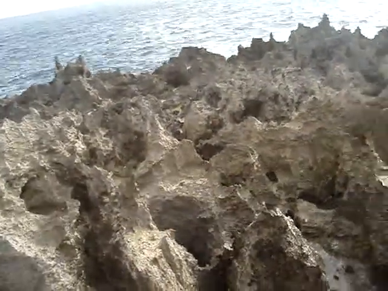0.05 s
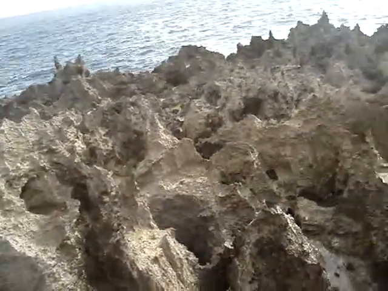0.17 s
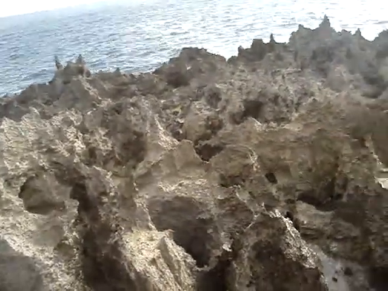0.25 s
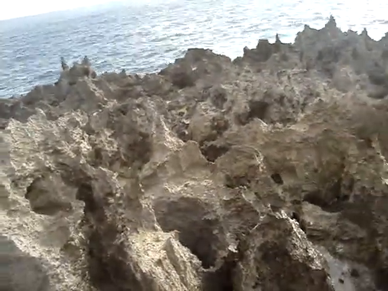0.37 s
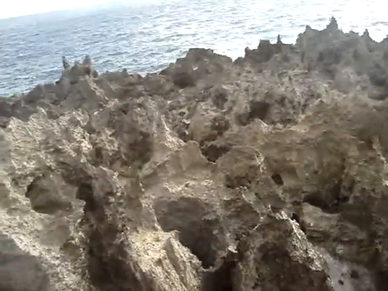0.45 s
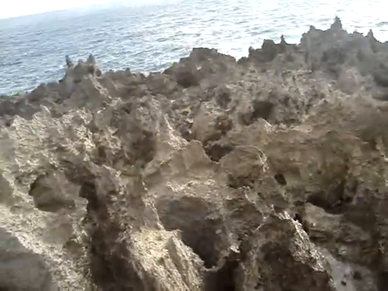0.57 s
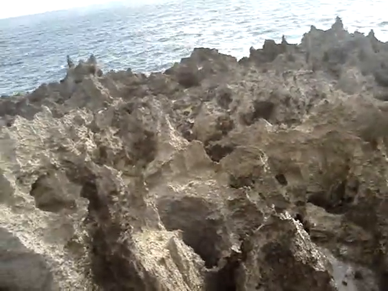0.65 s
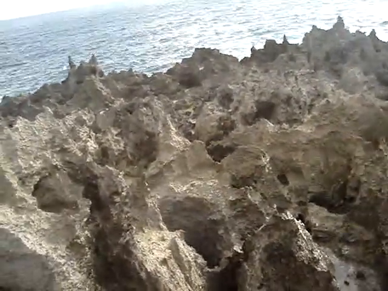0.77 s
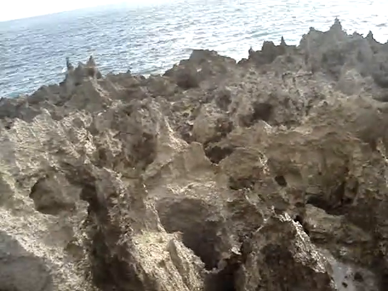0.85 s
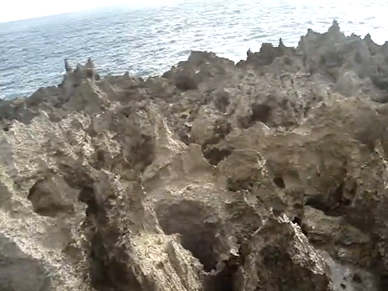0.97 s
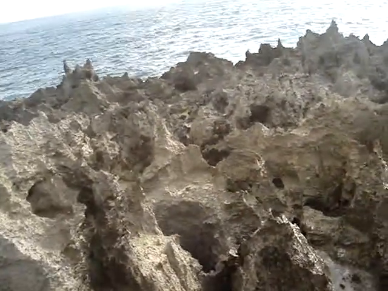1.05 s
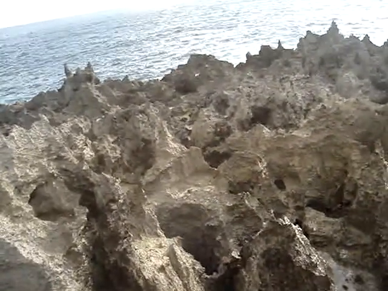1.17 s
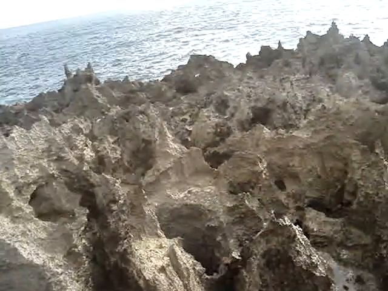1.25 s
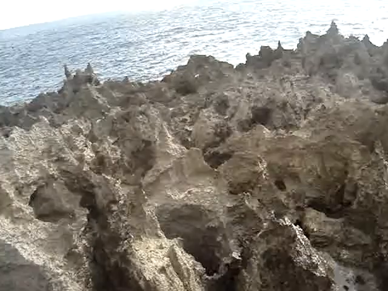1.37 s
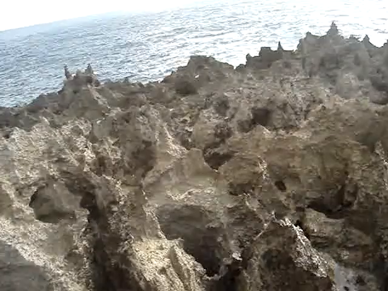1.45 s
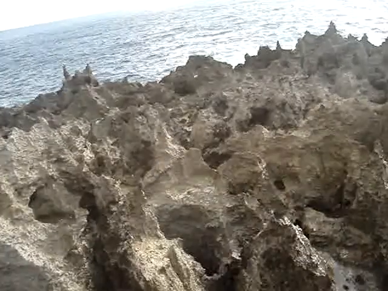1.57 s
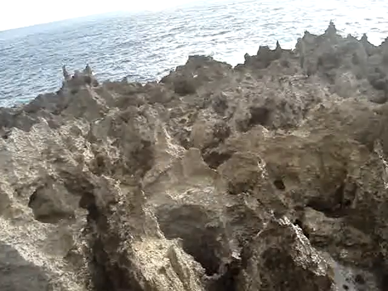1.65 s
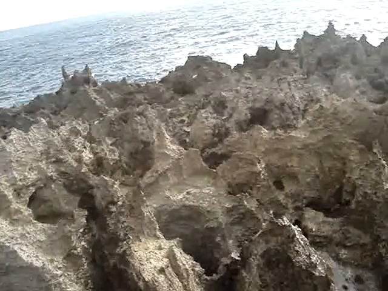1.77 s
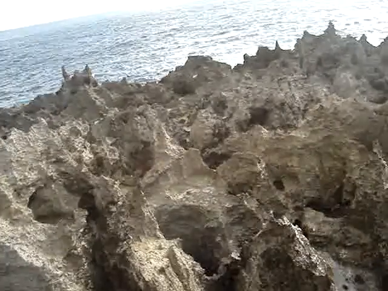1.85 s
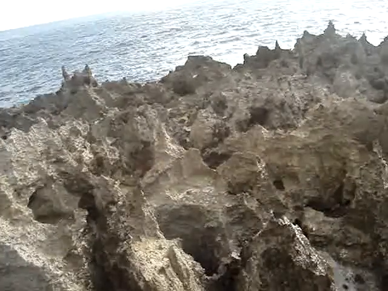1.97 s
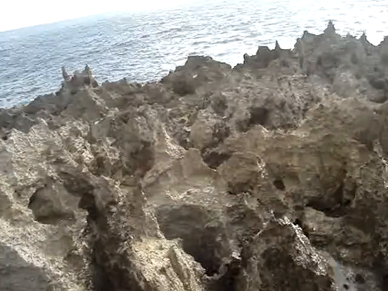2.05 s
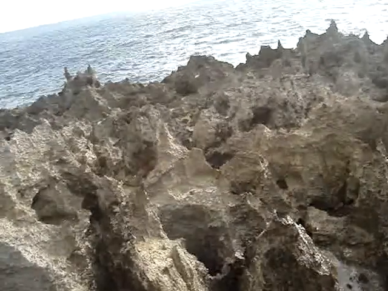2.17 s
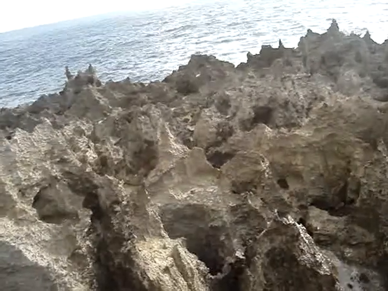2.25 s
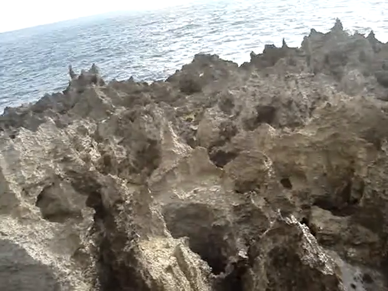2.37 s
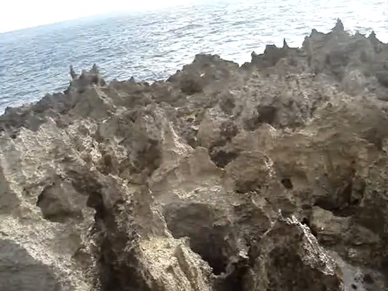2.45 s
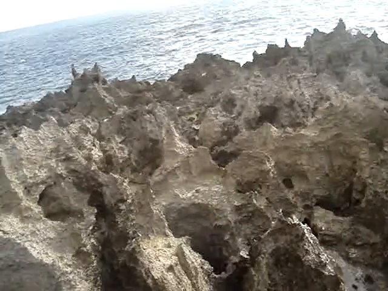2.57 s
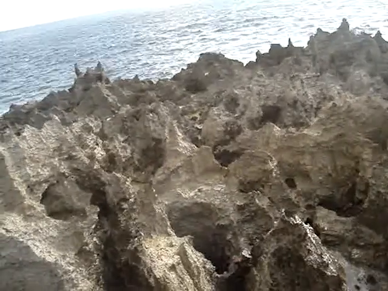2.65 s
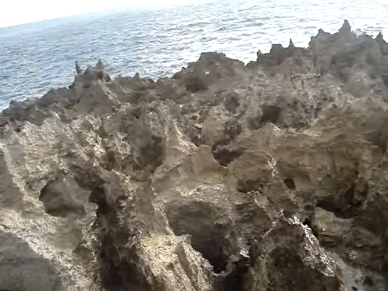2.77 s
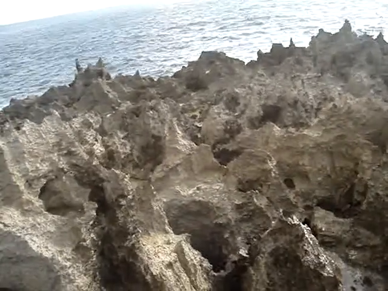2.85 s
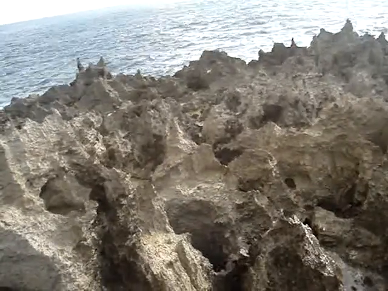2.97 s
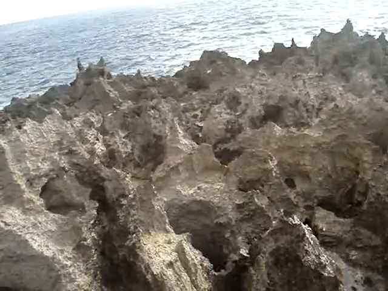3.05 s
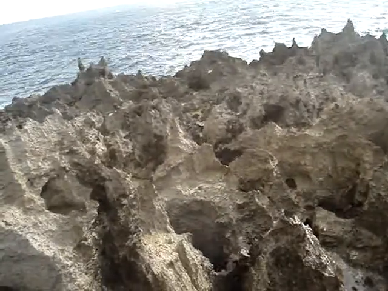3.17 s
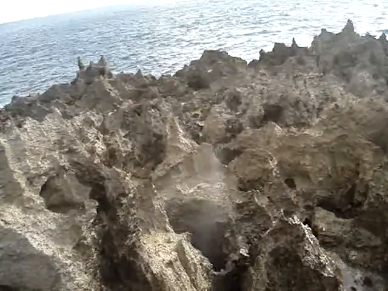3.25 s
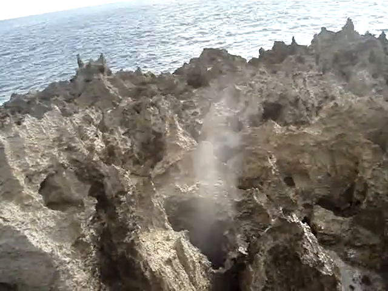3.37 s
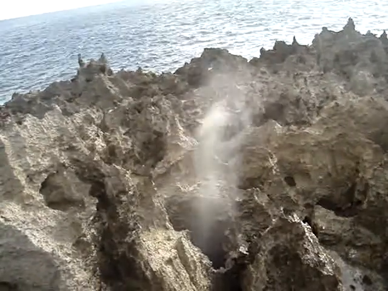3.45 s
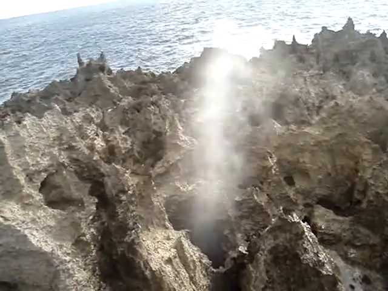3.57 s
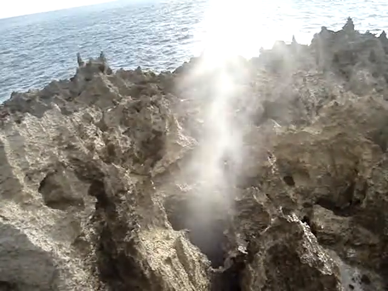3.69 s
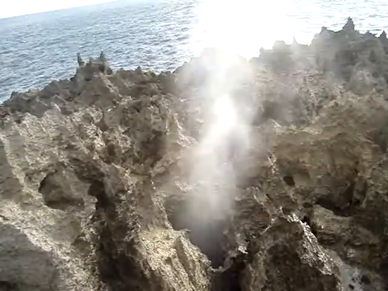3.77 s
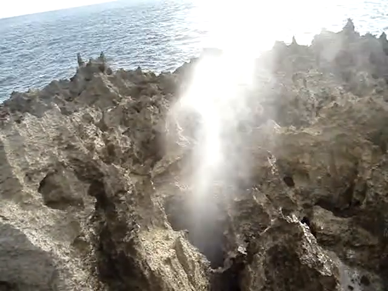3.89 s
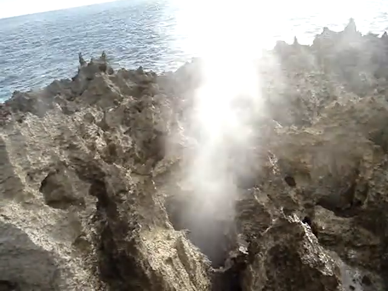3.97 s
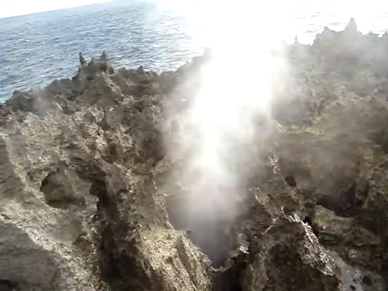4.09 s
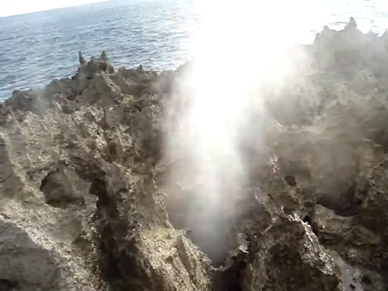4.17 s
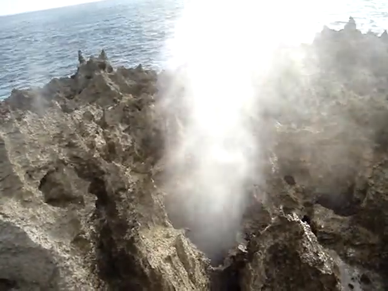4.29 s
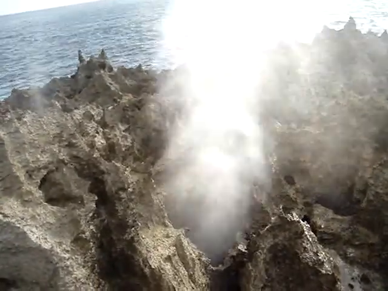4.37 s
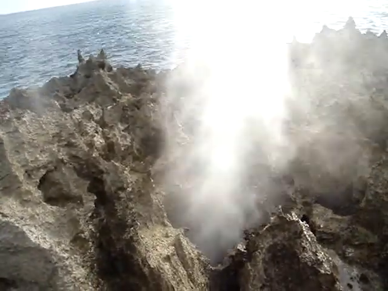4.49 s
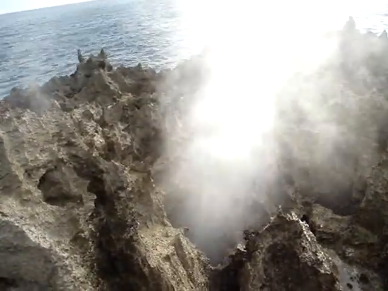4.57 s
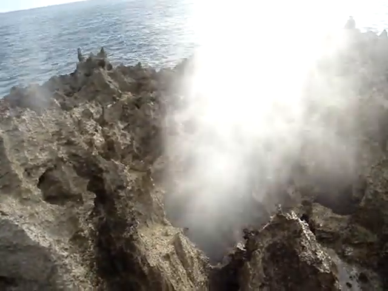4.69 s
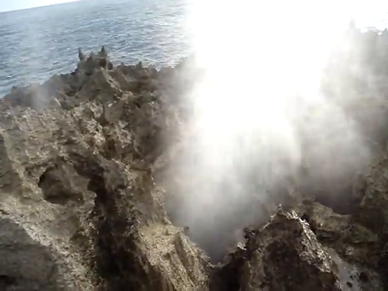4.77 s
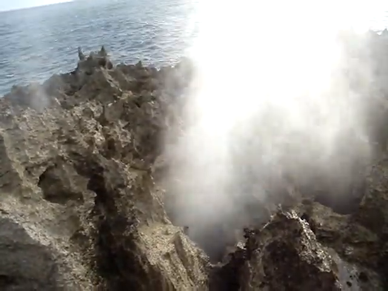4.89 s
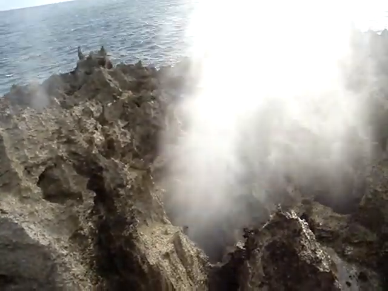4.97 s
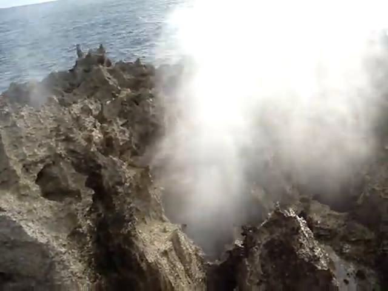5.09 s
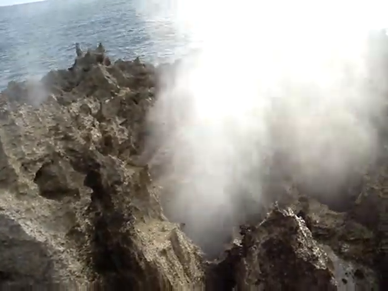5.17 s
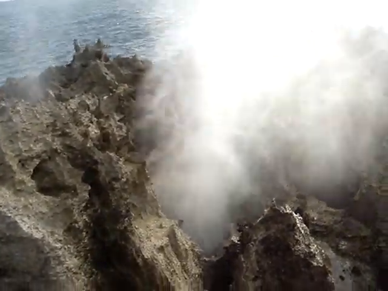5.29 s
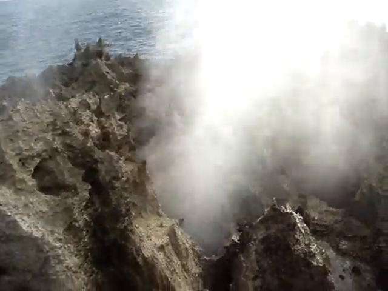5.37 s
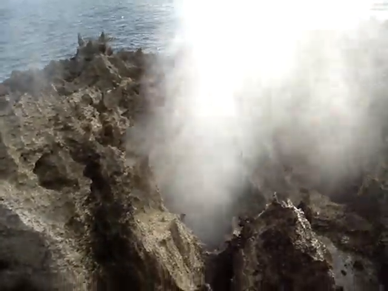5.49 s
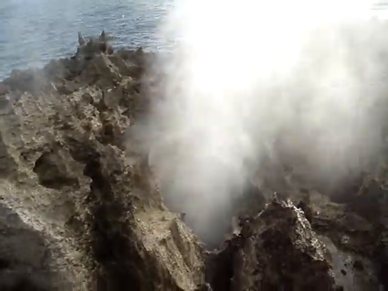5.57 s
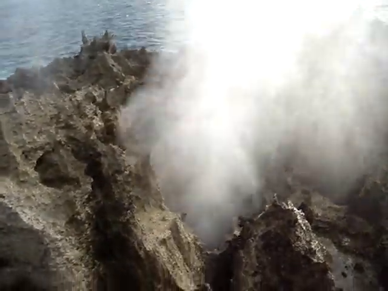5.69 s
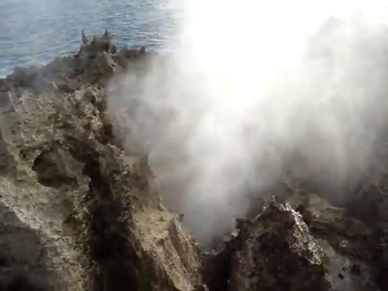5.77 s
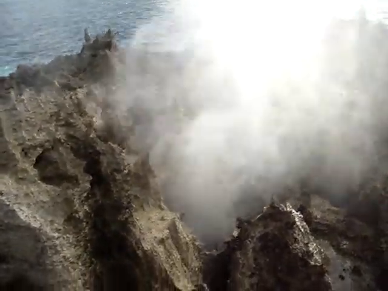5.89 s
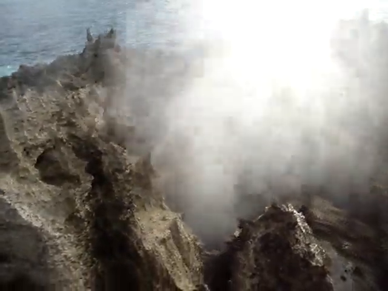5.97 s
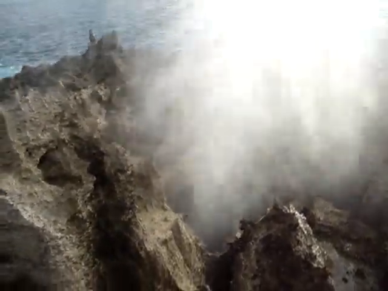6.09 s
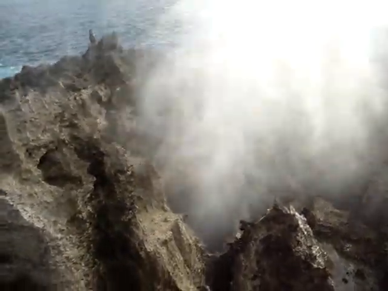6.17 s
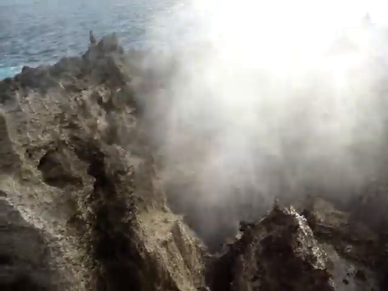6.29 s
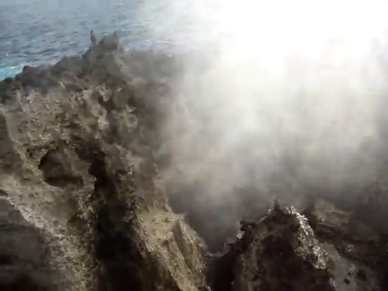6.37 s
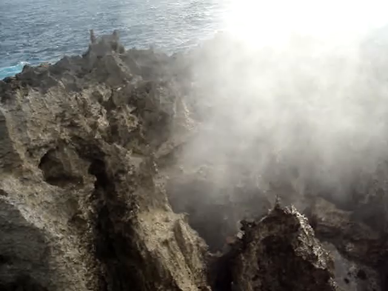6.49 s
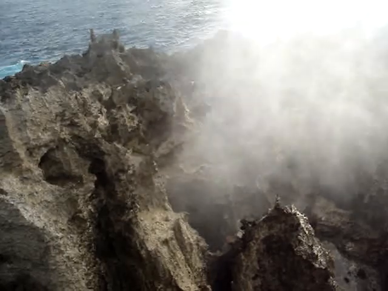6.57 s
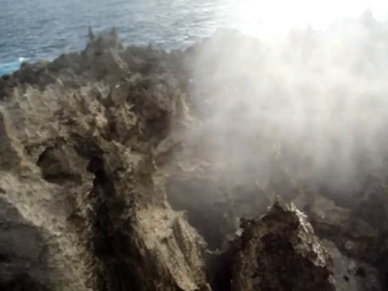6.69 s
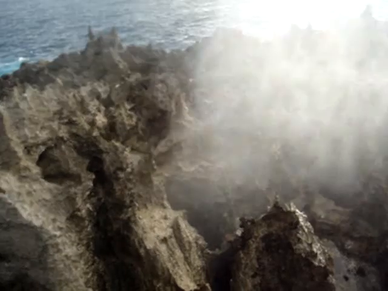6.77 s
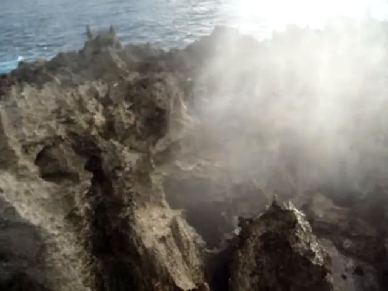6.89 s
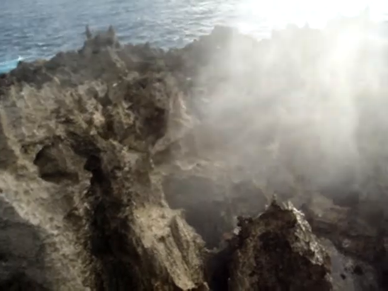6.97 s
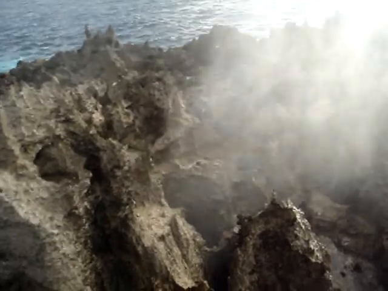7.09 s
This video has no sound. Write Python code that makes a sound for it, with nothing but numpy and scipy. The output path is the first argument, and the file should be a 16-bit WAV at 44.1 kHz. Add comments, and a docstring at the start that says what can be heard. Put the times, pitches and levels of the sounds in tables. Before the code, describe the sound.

On a rocky coast, steady surf and light wind rumble on the microphone are heard first. Then a wave forces air out of a hole in the rock: the cave below booms and the jet roars loudly, tearing water into a bright hiss for about three seconds. It drops away fast, leaving a light patter of falling drops, soft low thumps and a faint hoot over the surf.

```python
"""A blowhole on a rocky shore roars as a wave fills the cave below and forces air out of the rock throat.
The cave rumbles and thumps, and the jet tears water into hissing spray for about three seconds.
The jet shuts off quickly; spray patters down on the rocks and the draining hole hoots faintly.
Behind it are steady surf, two small splashes, a little wind on the microphone and a very faint whine."""
import sys
import numpy as np
from scipy import signal
from scipy.fft import rfft, irfft, next_fast_len
from scipy.io import wavfile
from scipy.ndimage import uniform_filter1d, map_coordinates

SR = 44100
rng = np.random.default_rng(int(sys.argv[2]) if len(sys.argv) > 2 else 0)


def wav_out(sig):
    """Save sig, one row per channel (or a flat mono array), as 16-bit PCM at SR to the path in sys.argv[1]."""
    wavfile.write(sys.argv[1], SR, np.round(np.clip(np.atleast_2d(sig).T, -1, 1) * 32767).astype(np.int16))


N = 314874

TREBLE_LIMIT_HZ = 10080
FULL_FLOW_DB = -19.5  # the air flow once the jet is at full strength
FILL_START_S, FILL_LENGTH_S = 3.66, 2  # rising water fills the cave

# The tone of the surf, from bass to treble: f/Hz, level/dB
SURF_TONE = [(40, -32), (150, -11.5), (290, -4), (500, -3), (680, -1), (870, 0), (1300, -13), (1550, -9),
             (1800, -12.5), (2600, -15.5), (3100, -16), (5000, -22.5), (8500, -29), (10000, -37)]
# The surf grows a little as a wave breaks: t/s, gain/dB
SURF_SURGES = [(.13, 0.9), (.9, 0.3)]
# The low rumble of wind on the microphone: f/Hz, level/dB
WIND_TONE = [(15, -9.5), (40, 0), (95, 0), (150, -8.5), (300, -32), (800, -74)]
# Gusts of that wind: t/s, half length/s, level/dB
WIND_GUSTS = [(.06, 0.2, -44.5), (1.25, .24, -49), (2.035, .025, -40), (2.73, 0.043, -44),
              (2.93, 0.073, -46), (7.13, 0.026, -37)]
# Small waves splashing on the rocks below: t/s, level/dB
SMALL_WAVES = [(.16, -45), (1.33, -48)]
# Air rushing out of the hole (a first puff, the full jet, the shut-off): t/s, level/dB
AIR_FLOW = [(2.98, -40), (3.13, -33), (3.41, -33.5), (3.84, -19.5), (6.14, -20), (6.53, -24), (6.71, -42),
            (6.78, -38.5), (7.08, -44.5)]
# Water reshapes the throat, so its notes slide and ring more or less: t/s, pitch ratio, ringing/dB
THROAT_CHANGES = [(3.2, 0.98, 1), (3.7, 1.02, 0.5), (4.2, 1.042, 0.5), (5.05, 1.045, 0.5), (5.5, 1.03, 0.5),
                  (5.9, 1.0, 1.5), (6.45, 1.006, 1.5), (6.8, 1.035, 1)]
# The deep boom of the cave: f/Hz, level/dB
BOOM_TONE = [(15, -33), (30, -10), (45, -7.5), (85, -1), (115, -0.5), (150, 2), (190, -6.5), (260, -13.5),
             (500, -66)]
# The notes at which the cave chamber rings: f/Hz, width/Hz, level/dB
CHAMBER_NOTES = [(229, 107, -1), (308, 93, -1.5)]
# The low notes of the rock throat above it: f/Hz, width/Hz, level/dB
THROAT_NOTES = [(591, 99, 1), (726, 150, 1.2), (780, 109, -1), (917, 170, -7.5)]
# The higher notes of the throat: f/Hz, width/Hz, level/dB
THROAT_OVERTONES = [(1165, 150, 2), (1546, 190, 5.5), (2070, 260, 2), (2614, 250, -2.5), (3090, 190, -1.5),
                    (3640, 180, -1.5), (4230, 350, -1.5), (4760, 360, -6)]
# The near-whistle of the throat at its narrowest: f/Hz, width/Hz, level/dB
WHISTLE_NOTE = [(2556, 180, 0)]
# The plain hiss of the jet: f/Hz, level/dB
JET_TONE = [(300, -52), (700, -16.5), (1100, 3), (1800, -4), (3000, -1.5), (4500, -6.5), (5600, -4.5),
            (6800, -10.5), (10000, -23.5)]
# The higher hiss of fine mist: f/Hz, level/dB
MIST_TONE = [(3000, -42), (5000, -10.5), (6300, -3.5), (7000, 2.5), (8500, 4), (9500, 1), (10100, -8)]
# How much water is torn into spray, lagging the air at first: t/s, level/dB
SPRAY_AMOUNT = [(3.0, -51), (3.17, -44), (3.32, -43), (3.91, -27.5), (4.81, -24.5), (5.83, -24),
                (6.45, -27), (6.65, -39), (7.1, -43.5)]
# Water slams into the back of the cave and later sloshes back: t/s, half length/s, level/dB
WATER_BLOWS = [(3.967, 0.19, -22), (6.72, 0.11, -34.5), (7.025, .07, -38)]
# The low cave notes that these blows stir up: f/Hz, width/Hz, level/dB
THUMP_NOTES = [(85, 70, -8.5), (158, 70, 1), (320, 150, -7)]
# The hollow note of the draining hole: t/s, f/Hz, level/dB
HOOT_PATH = [(6.8, 388.4, -60), (6.845, 380, -35), (6.96, 365, -45), (7.025, 361.6, -33),
             (7.09, 372.4, -56)]


def amp(db):
    """Turn decibels into a number to multiply by."""
    return 10 ** (np.asarray(db) / 20)


def unit(x):
    """Scale a sound so its average strength (rms) is 1."""
    return x / np.sqrt(np.mean(x ** 2) + 1e-20)


def curves(rows):
    """Join a table's points with straight lines: one curve for each column after the time."""
    times, *columns = np.transpose(rows)
    return [np.interp(np.arange(N) / SR, times, column) for column in columns]


def faded_in(rows, db_per_s=70):
    """A level curve in dB that rises out of silence before its first point."""
    level_db, = curves(rows)
    return level_db - db_per_s * np.maximum(rows[0][0] - np.arange(N) / SR, 0)


def swell(centre_s, width_s):
    """A smooth rise and fall, 1 at its centre."""
    return np.exp(-((np.arange(N) / SR - centre_s) / width_s) ** 2)


def wobble(rate):
    """A smooth curve through `rate` random values a second."""
    return map_coordinates(rng.standard_normal(400), [np.arange(N) * rate / SR], mode="wrap")


def filtered(x, response):
    """Turn each frequency in x up or down by the gain that `response` gives it."""
    size = next_fast_len(len(x) + 8192)
    return irfft(rfft(x, size) * response(np.fft.rfftfreq(size, 1 / SR)), size)[:len(x)]


def tone(points):
    """A filter shape drawn through a table of frequencies and levels."""
    points_hz, db = np.transpose(points)
    return lambda hz: amp(np.interp(np.log(hz + 1), np.log(points_hz), db))


def ringing(notes):
    """A filter shape with a steep peak at each note where a hollow space rings."""
    def response(hz):
        power = 0
        for centre, width, db in notes:
            off_pitch = (centre ** 2 - hz ** 2) / (1.46 * width * hz + 1e-9)
            power += (amp(db) / (1 + off_pitch ** 2)) ** 2
        return np.sqrt(power)
    return response


def rushing(response, patchy_db, size=N):
    """Swirling air or water: filtered noise with short louder and softer patches."""
    spectra = signal.stft(rng.standard_normal(size), nperseg=512)[2]
    patches = uniform_filter1d(rng.standard_normal(spectra.shape), size=6, axis=0)  # blur in pitch
    patches = uniform_filter1d(patches, size=14, axis=1)  # blur in time
    noise = signal.istft(spectra * amp(patchy_db * unit(patches)), nperseg=512)[1][:size]
    return unit(filtered(noise, response))


def gliding(notes, pitch_ratio, patchy_db):
    """Ringing noise whose notes all slide up and down together."""
    steady = rushing(ringing(notes), patchy_db, size=N + SR)
    return map_coordinates(steady, [np.cumsum(pitch_ratio)], order=3, mode="wrap")


def drops(per_second, centre_hz, spread_db):
    """Many drops hit rock, each making a tick that dies away in a couple of cycles."""
    draws = rng.random((12000, 4))
    chosen = draws[:, 3] < per_second * N / SR / len(draws)
    start, pitch, softness, _ = draws[chosen].T[:, :, None]
    age = np.arange(96)  # samples since the drop landed
    cycles = age / SR * np.minimum(centre_hz * 4 ** (pitch - .5), TREBLE_LIMIT_HZ)
    strength = amp(-spread_db * np.log(.02 + softness))
    ticks = strength * np.sin(2 * np.pi * cycles) * np.exp(-cycles)
    positions = (start * N).astype(int) + age
    return unit(np.bincount(positions.ravel(), ticks.ravel(), N)[:N])


def surf():
    """Surf rushes steadily below the cliff and swells a little as waves break."""
    surge_db = sum(db * swell(s, width_s=.09) for s, db in SURF_SURGES)
    return amp(-35.0 + surge_db + 0.3 * wobble(5.5)) * rushing(tone(SURF_TONE), patchy_db=0.47)


def wind():
    """A light breeze and short gusts rumble on the microphone."""
    breeze = amp(-53.5)
    gusts = sum(amp(db) * swell(s, width) for s, width, db in WIND_GUSTS)
    return (breeze + gusts) * amp(1.2 * wobble(14)) * rushing(tone(WIND_TONE), patchy_db=2.0)


def whine():
    """A very faint, thin, high whine, covered once the jet starts."""
    return amp(-65.5) * rushing(ringing([(8125, 120, 0)]), patchy_db=.1)


def splashes():
    """Each small wave throws up a short, soft shower of drops."""
    level = sum(amp(db) * swell(s, width_s=0.051) for s, db in SMALL_WAVES)
    return level * drops(per_second=1500, centre_hz=2390, spread_db=2.0)


def air_driven(base_db, flow_slope, filled_db):
    """A gain that follows the air flow and shifts by filled_db as water fills the cave."""
    fill = np.clip((np.arange(N) / SR - FILL_START_S) / FILL_LENGTH_S, 0, 1)
    return amp(base_db + flow_slope * (faded_in(AIR_FLOW) - FULL_FLOW_DB) + filled_db * fill)


def cave_rumble():
    """Moving air makes the cave boom and ring; rising water damps both."""
    boom = rushing(tone(BOOM_TONE), patchy_db=1.84)
    chamber = rushing(ringing(CHAMBER_NOTES), patchy_db=0.77)
    return (boom * air_driven(base_db=-29.5, flow_slope=0.55, filled_db=-4)
            + chamber * air_driven(base_db=-22, flow_slope=0.8, filled_db=-3.5))


def throat_roar(pitch_ratio, sputter):
    """Air roars through the rock throat, with a last spit as water seals it."""
    level = air_driven(base_db=-20, flow_slope=1.04, filled_db=0.53)
    spit_db = 2.7 * swell(6.59, width_s=0.035)
    return level * amp(spit_db + 0.18 * sputter) * gliding(THROAT_NOTES, pitch_ratio, patchy_db=-0.16)


def spray_hiss(pitch_ratio, ring_db, sputter):
    """The jet tears water into spray; the more the throat rings, the less of it is plain hiss."""
    overtones = amp(ring_db - 4.0) * gliding(THROAT_OVERTONES, pitch_ratio, patchy_db=1.1)
    hiss = amp(-1.5 - 0.93 * ring_db) * rushing(tone(JET_TONE), patchy_db=0.77)
    whistle = amp(-15.5 + 4.9 * ring_db) * gliding(WHISTLE_NOTE, pitch_ratio, patchy_db=-0.5)
    mist = amp(-11.5) * rushing(tone(MIST_TONE), patchy_db=1.7)
    level = amp(faded_in(SPRAY_AMOUNT) + 0.1 + 0.43 * sputter)
    return level * (overtones + hiss + whistle + mist)


def blowhole():
    """A wave forces air through the cave and out of the throat: rumble, roar and hiss."""
    pitch_ratio, ring_db = curves(THROAT_CHANGES)
    sputter = wobble(18)  # lumps of water make the whole jet flutter
    return cave_rumble() + throat_roar(pitch_ratio, sputter) + spray_hiss(pitch_ratio, ring_db, sputter)


def thumps():
    """Each blow of water makes the cave boom briefly."""
    level = sum(amp(db) * swell(s, width) for s, width, db in WATER_BLOWS)
    return level * rushing(ringing(THUMP_NOTES), patchy_db=1.0)


def falling_spray(flight_s=1.1):
    """Water thrown up by the jet patters on the rocks about a second later."""
    t = np.arange(N) / SR
    landing_db = np.interp(t - flight_s, t, faded_in(SPRAY_AMOUNT))
    return amp(landing_db - 23.5) * drops(per_second=900, centre_hz=4300, spread_db=3.0)


def hoot():
    """Air drawn back across the hole sounds a weak, unsteady note."""
    pitch_hz, level_db = curves(HOOT_PATH)
    phase = 2 * np.pi * np.cumsum(pitch_hz * (1 + 0.0063 * wobble(40))) / SR
    sounding = np.arange(N) / SR > HOOT_PATH[0][0]
    return sounding * amp(level_db - 0.5 + 1.3 * wobble(25)) * unit(np.sin(phase))


def scene():
    """Everything heard from one spot on the rocks, in one channel."""
    return (surf() + wind() + splashes() + blowhole() + thumps() + falling_spray() + hoot() + whine())[None]


def record(dry):
    """Cut away the highest treble, fading it out across 200 Hz."""
    return filtered(dry[0], lambda hz: np.clip((TREBLE_LIMIT_HZ - hz) / 200 + .5, 0, 1))[None]


dry = scene()
out = record(dry)
wav_out(out)
```